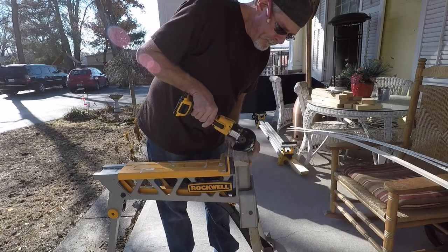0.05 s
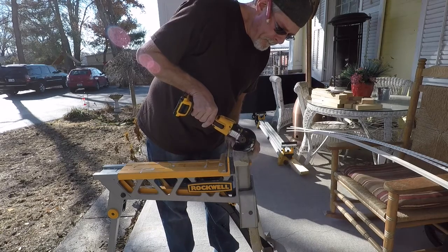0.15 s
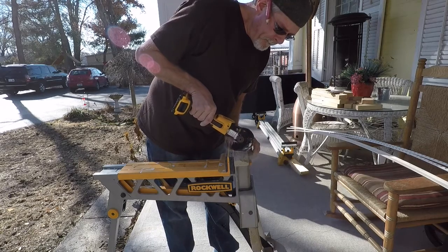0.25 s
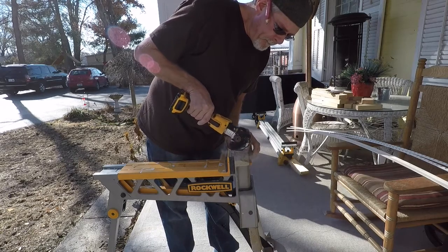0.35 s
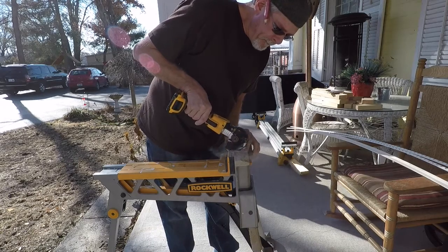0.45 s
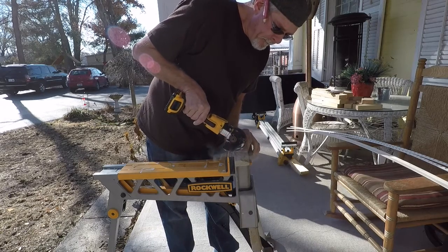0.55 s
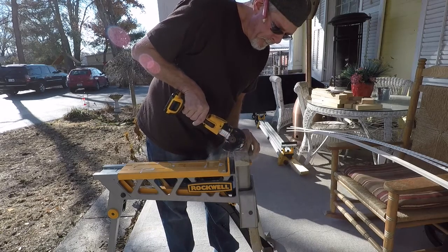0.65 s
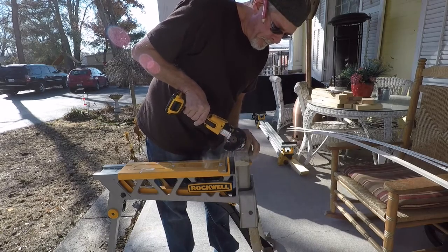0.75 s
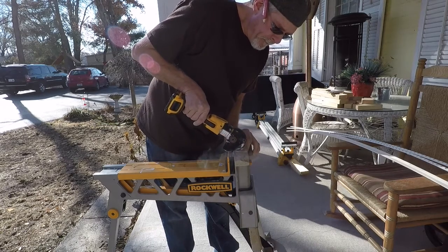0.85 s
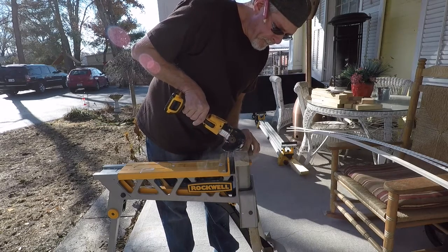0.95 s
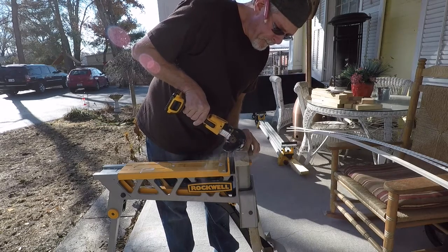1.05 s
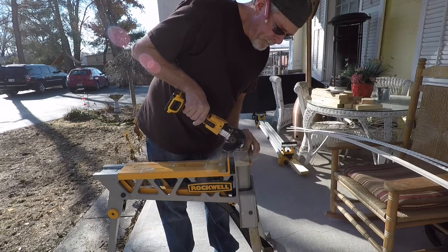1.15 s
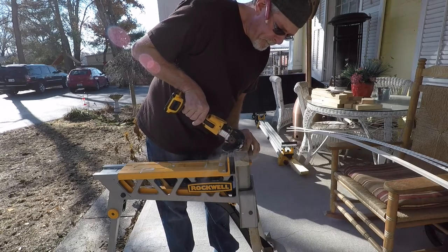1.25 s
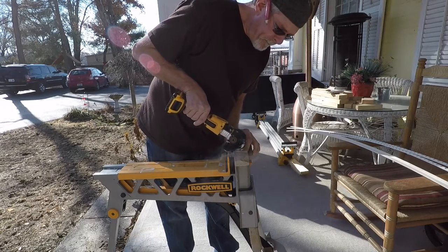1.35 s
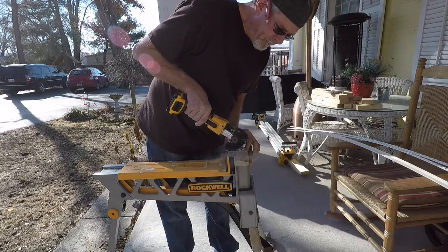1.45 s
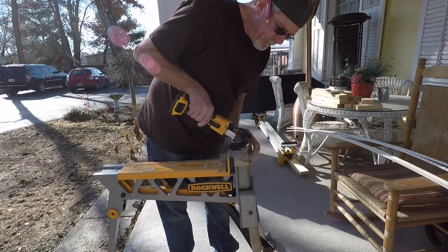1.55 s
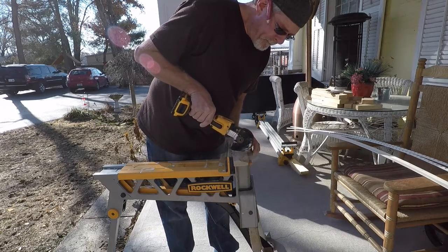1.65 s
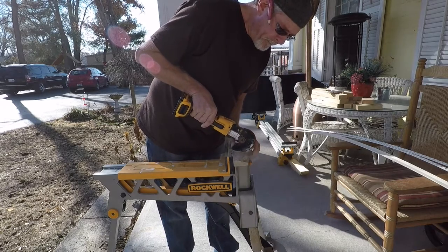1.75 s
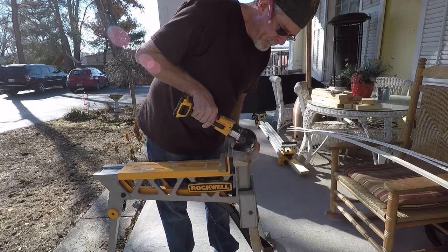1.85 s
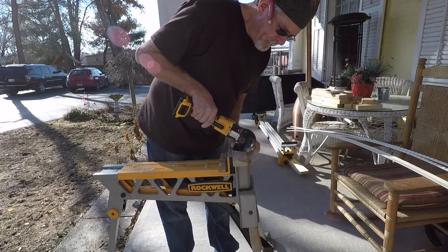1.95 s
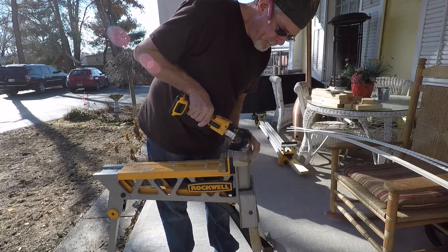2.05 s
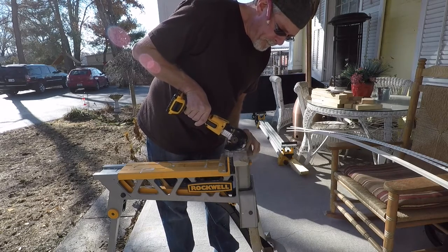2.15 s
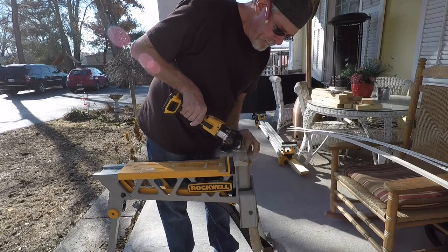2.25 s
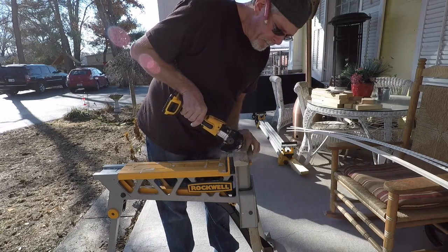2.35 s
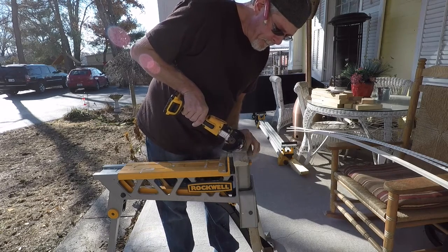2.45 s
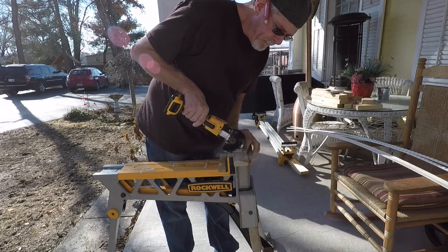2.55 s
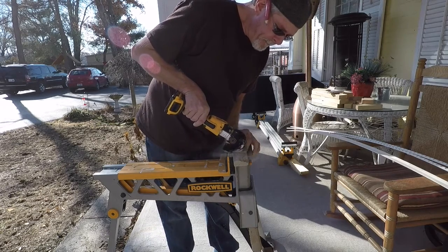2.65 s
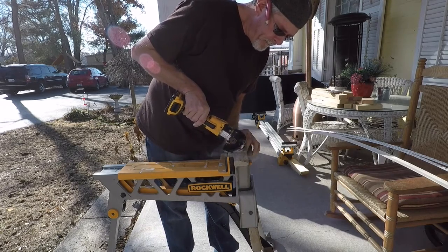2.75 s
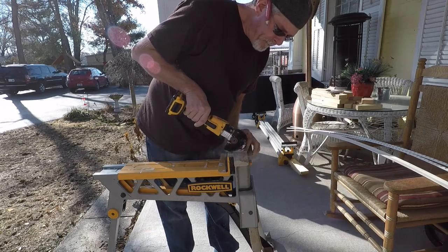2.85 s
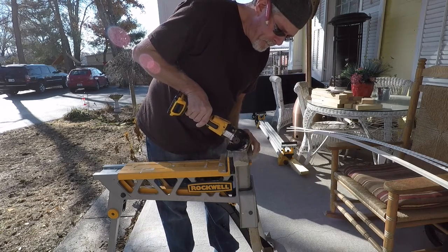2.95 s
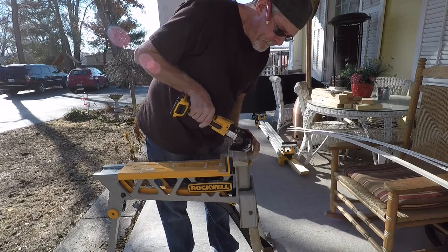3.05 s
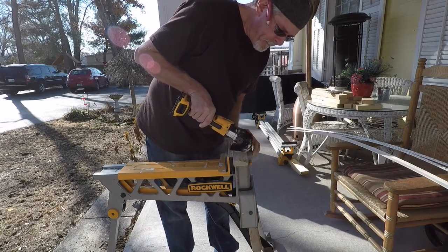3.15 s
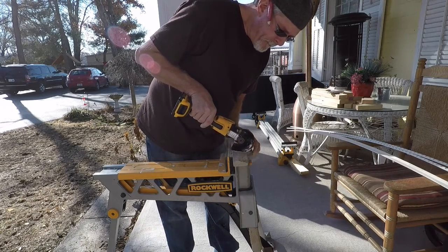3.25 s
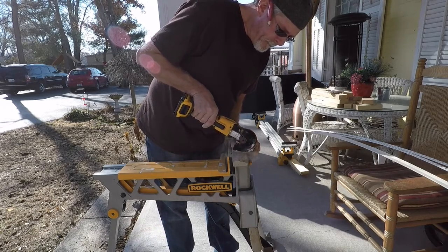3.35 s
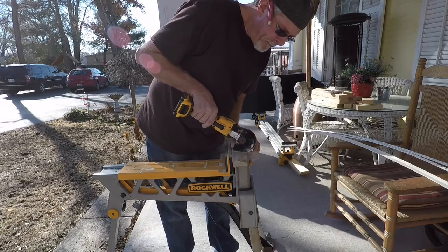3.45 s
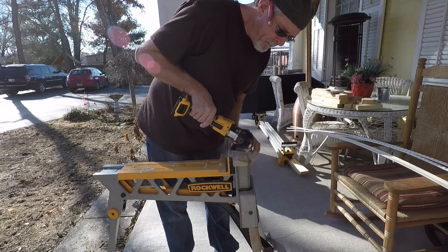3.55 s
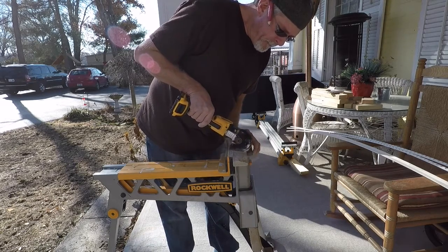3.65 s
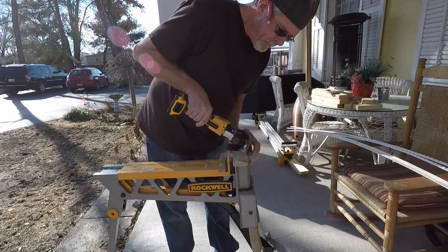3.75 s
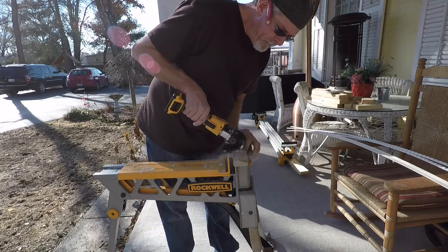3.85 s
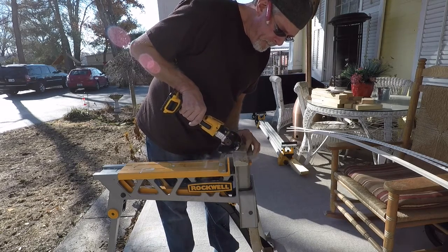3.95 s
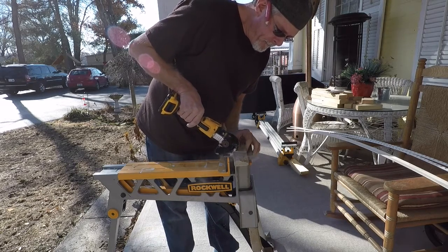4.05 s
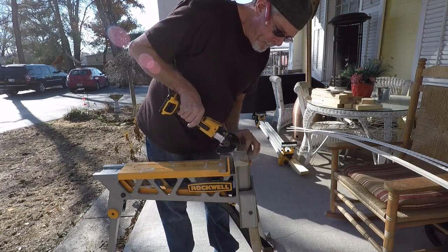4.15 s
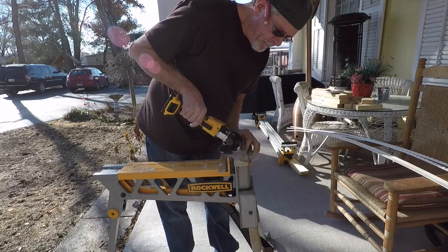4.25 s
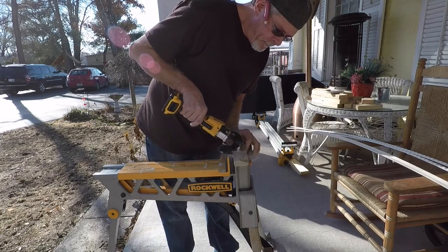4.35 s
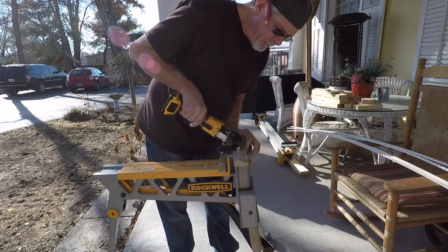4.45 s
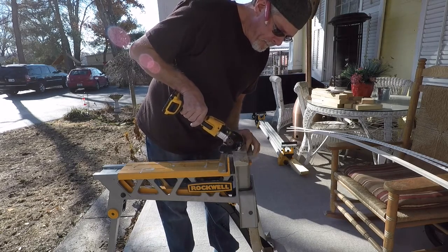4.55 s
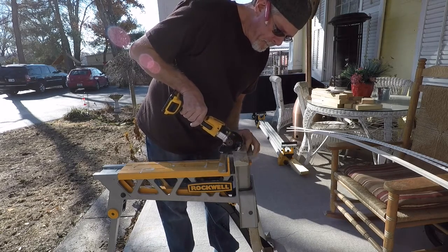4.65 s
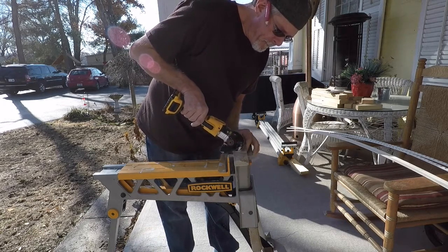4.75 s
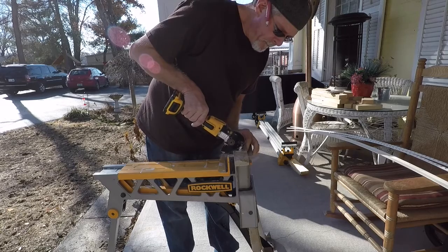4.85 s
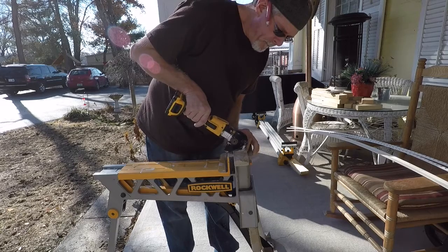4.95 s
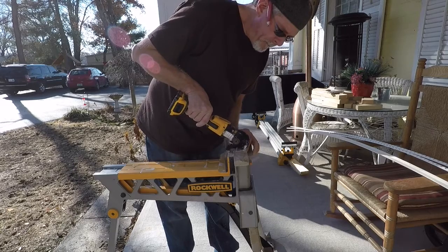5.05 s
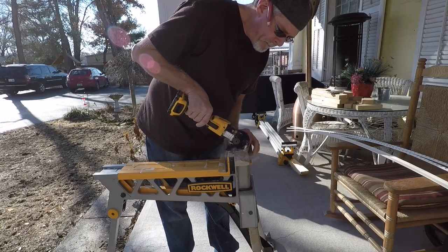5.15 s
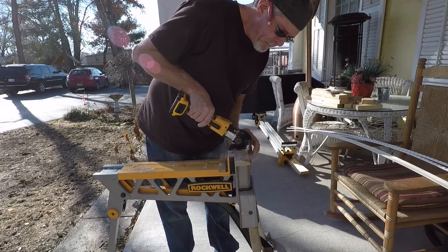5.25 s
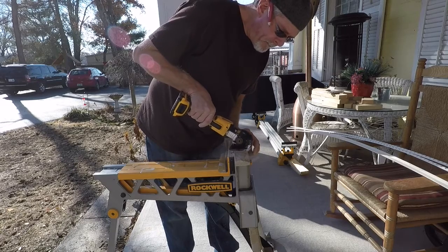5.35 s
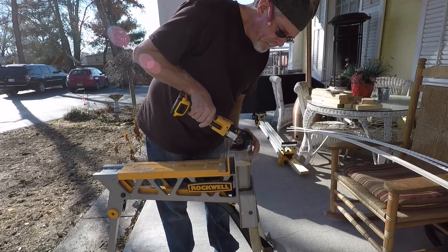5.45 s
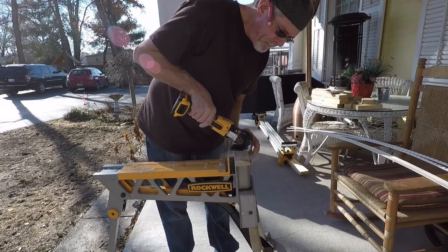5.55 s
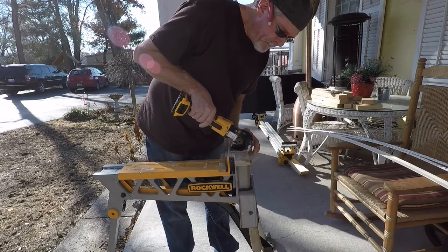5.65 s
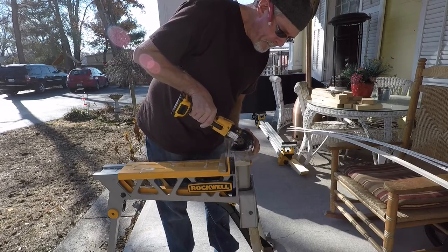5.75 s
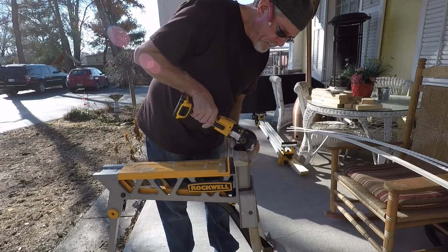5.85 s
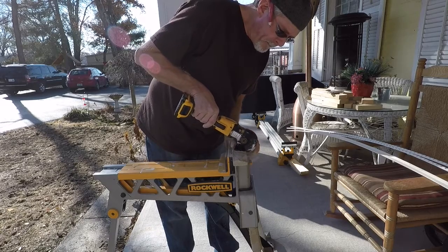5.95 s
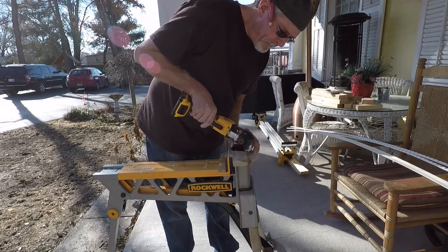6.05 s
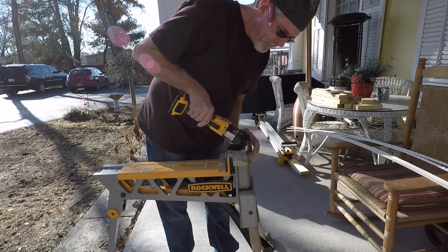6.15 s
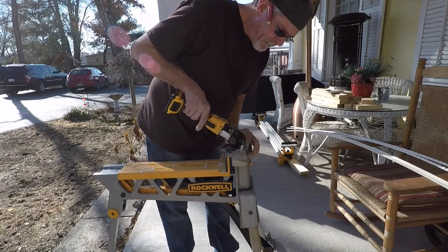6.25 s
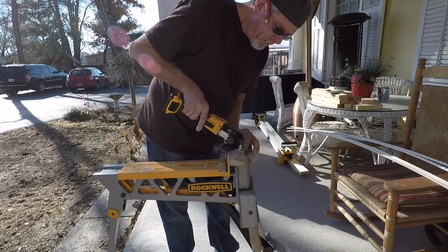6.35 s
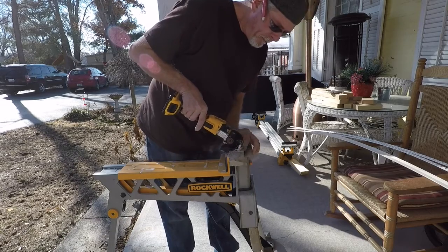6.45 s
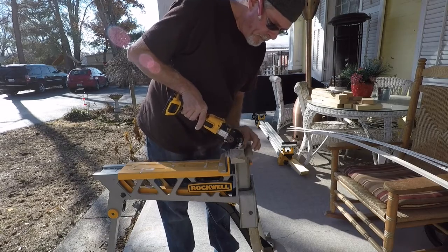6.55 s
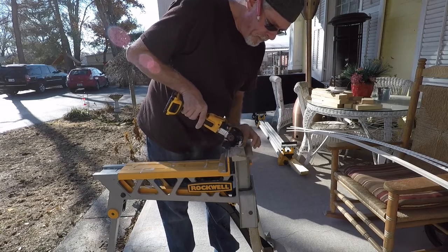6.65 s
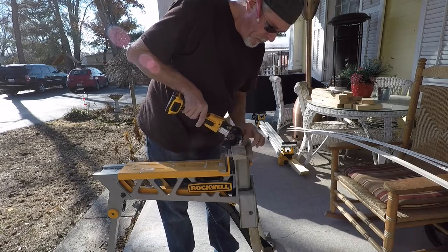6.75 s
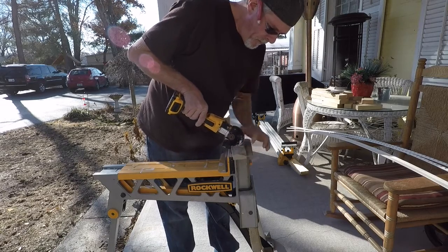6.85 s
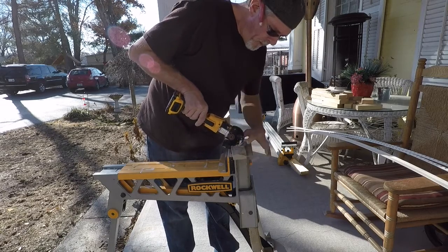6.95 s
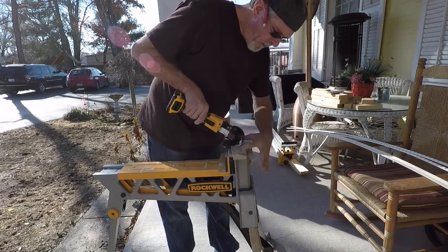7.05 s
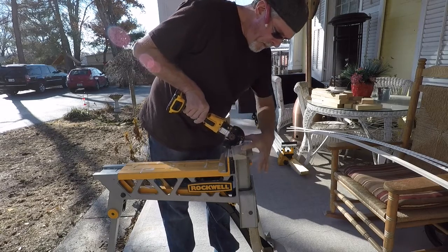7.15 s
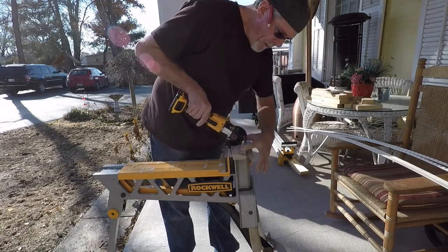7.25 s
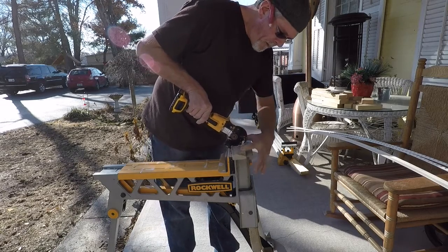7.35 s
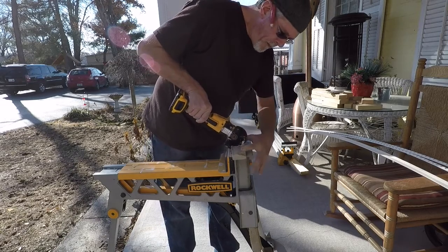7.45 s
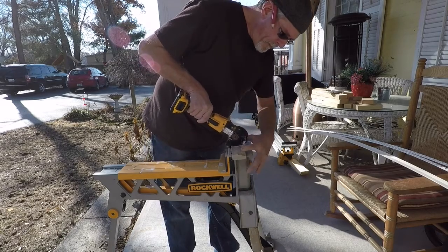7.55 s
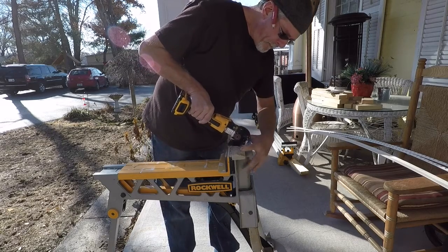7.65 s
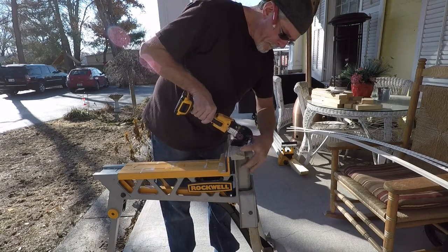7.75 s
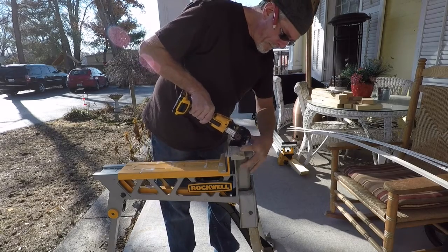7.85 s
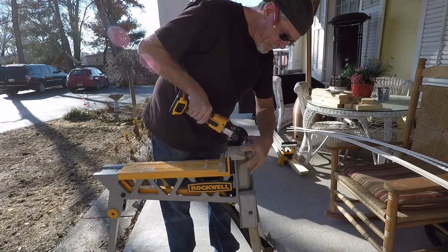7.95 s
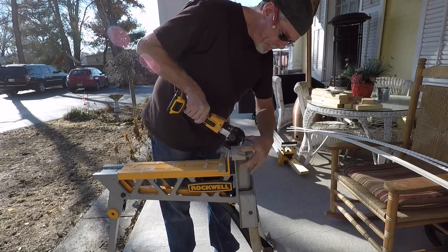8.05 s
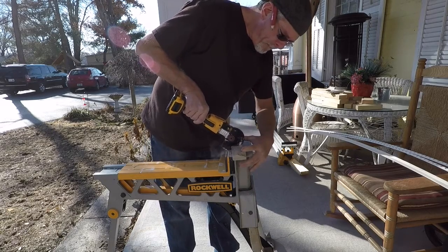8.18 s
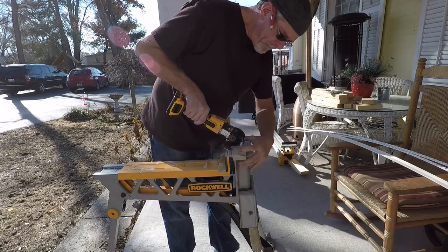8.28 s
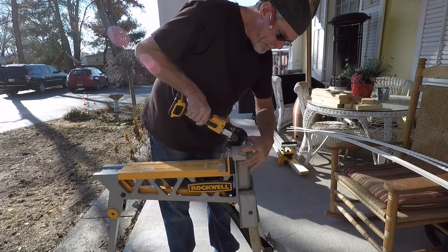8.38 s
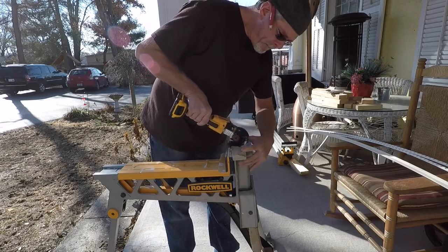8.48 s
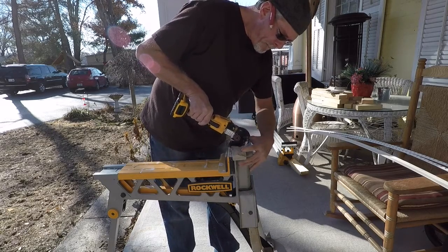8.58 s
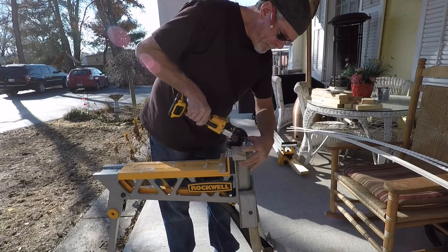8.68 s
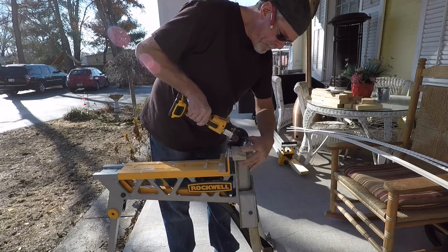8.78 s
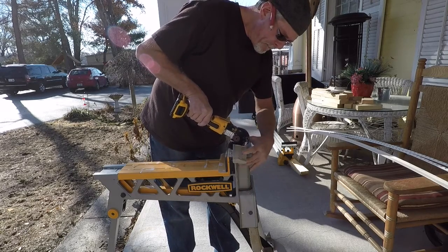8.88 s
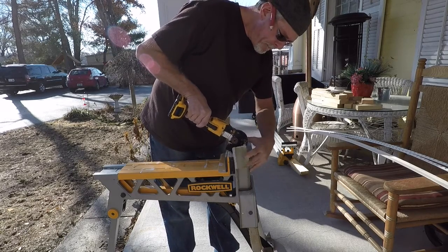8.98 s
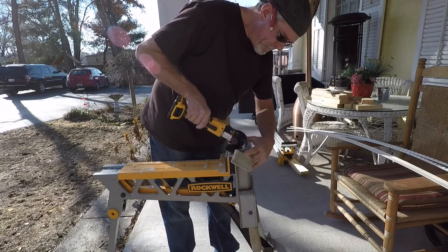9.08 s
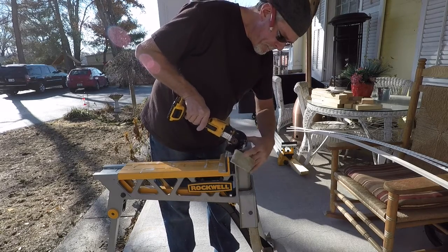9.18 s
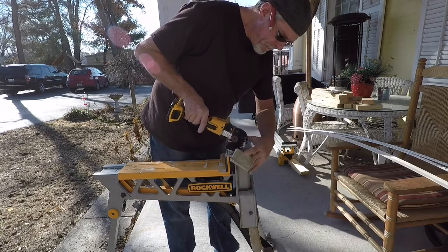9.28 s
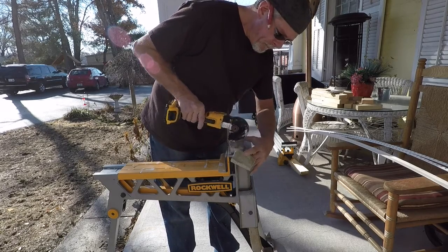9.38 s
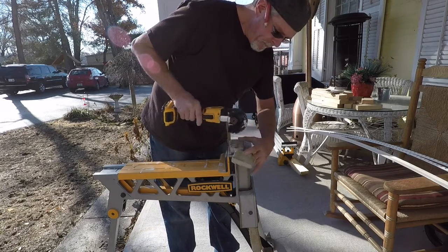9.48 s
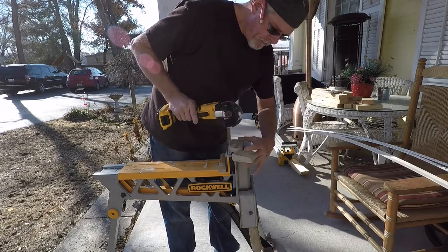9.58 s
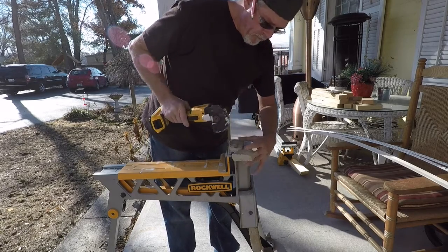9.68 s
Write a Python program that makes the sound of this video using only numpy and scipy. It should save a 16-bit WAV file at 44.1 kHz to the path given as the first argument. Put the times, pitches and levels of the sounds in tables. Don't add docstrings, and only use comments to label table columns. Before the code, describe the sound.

Already running at the start, an oscillating power tool grinds through a clamped slab of faux stone with a loud, rasping, slightly unsteady buzz. After about six seconds it brakes abruptly, leaving quiet yard hiss and tiny handling clicks. The trigger snaps, a very short burst follows, then a second cut of under two seconds. The blade lifts clear, runs down and rings faintly. Close microphone on an open porch, with light wind rumble.

```python
import sys
import numpy as np
from scipy import signal
from scipy.fft import rfft, irfft
from scipy.io import wavfile
from scipy.ndimage import uniform_filter1d, map_coordinates

SR = 44100
rng = np.random.default_rng(int(sys.argv[2]) if len(sys.argv) > 2 else 0)


def gain_from_db(level_db):
    decades = np.asarray(level_db, float) / 20
    return 10 ** decades


def log_audio(samples):
    frames = np.atleast_2d(samples).T
    limited = np.clip(frames, -1, 1)
    pcm = np.round(limited * 32767).astype(np.int16)
    wavfile.write(sys.argv[1], SR, pcm)


N = 428642

# (hum [rel dB], slab rattle [dB], blade sizzle [dB])
SEAT_BALANCE = [(-29.2, 4, -2.5), (-31, 2, -3.5), (-34.5, 4, 1), (-26.5, .5, -1.6), (-35.5, 1, -.5),
                (-35, 4, 1), (-29.5, 3, -1.8), (-30, 3, -3.5), (-31, 1.5, -1.5), (-27.5, .6, -1.4),
                (-27.5, -1.5, -1.5), (-27, 2.5, -1.7), (-30.5, 2.1, -3.8), (-29.2, 3.5, -2.5)]
SEAT_THUD = [(3,), (0,), (2,), (-3,), (7,), (2,), (3,), (-2,), (1,), (-6,), (-7,), (-4,), (-2,), (0,)]
# (frequency [Hz], width [Hz], added level [dB])
BLADE_MODES = [(7300, 350, -3), (8100, 250, -5), (9000, 300, -8), (11700, 350, -3), (12900, 350, -5)]


def tool():
    t = np.arange(N) / SR
    hz, repeating, alternating = stroke(t)
    speed, cut_gain = motor(t)
    loose = np.clip(1 - repeating - alternating, .02, 1)
    chatter = .004 * loose ** 2 * drift(N, size=400)
    hand_tremor = .0035 * drift(N, size=3000)
    turns = np.cumsum(hz * (1 + chatter + hand_tremor)) / SR

    hum_db, rattle_db, sizzle_db = seated(SEAT_BALANCE, t)
    skid_dull_db = -3
    rattle_db, sizzle_db = np.clip([rattle_db, sizzle_db + skid_dull_db * skid(t)], -4, 4)
    slow_rattle_db = 7 * np.sqrt(1 - speed)
    thud_db = seated(SEAT_THUD, t)[0] * speed ** 6
    boom_db = np.where(braked(t), 6, 13)

    grains = patchy(grit(turns))
    grains = grains + (gain_from_db(rattle_db + slow_rattle_db) - 1) * band(grains, 120, 3400)
    grains -= (1 - loose) ** .8 * band(grains, 100, 950)
    grains += (gain_from_db(thud_db) - 1) * band(grains, 330, 800)
    grains += gain_from_db(boom_db) * np.clip(1 - hz / 270, 0, 1) * band(grains, 490, 760)

    grain_gain = loose ** .75 * gain_from_db(-2.5 + 1.2 * drift(N, size=900))
    cut = buzz(turns, loose) + grain_gain * grains
    cut *= 1 + .15 * np.sqrt(alternating) * np.cos(np.pi * turns)
    cut += sum(gain_from_db(db) * signal.lfilter(*signal.iirpeak(f_hz, f_hz / width_hz, SR), cut)
               for f_hz, width_hz, db in BLADE_MODES)
    cut += (gain_from_db(sizzle_db) - 1) * band(cut, 6000, 18000)
    hum = np.sqrt(2) * gain_from_db(hum_db) * (hz / 290) ** 6 * np.sin(2 * np.pi * turns)
    return cut_gain * (cut + hum)


# (multiple of stroke rate [1], level [dB])
BURIED = [(1, -17), (2, -19), (3, -14), (4, -15), (5, -4), (6, -4), (7, -9), (8, -4), (9, -10), (10, -10),
          (11, -8), (12, 0), (13, -10), (14, -10), (15, -8), (16, -7), (17, -5), (18, -12), (19, -16),
          (20, -14), (21, -17), (22, -15)]
BINDING = [(1, -15), (2, -14), (3, -10), (4, -4), (5, -9), (6, -3), (7, -5), (8, -4), (9, -8), (10, -3),
           (11, -5), (12, 0), (13, -4), (14, -11), (15, -3), (16, -3), (17, -4), (18, -7), (19, -10),
           (20, -14), (21, -15), (22, -14)]
SHALLOW = [(1, -20), (2, -11), (3, -17), (4, -13), (5, -6), (6, 0), (7, -1), (8, -9), (9, -2), (10, -6),
           (11, -1), (12, -3), (13, -9), (14, -6), (15, -4), (16, -3), (17, -5), (18, -13), (19, -15),
           (20, -15), (21, -12), (22, -10)]
SECOND_KERF = [(1, -16), (2, -22), (3, -17), (4, -14), (5, -13), (6, -8), (7, -11), (8, -9), (9, -8),
               (10, -9), (11, -6), (12, 0), (13, -7), (14, -11), (15, -8), (16, -8), (17, -4), (18, -12),
               (19, -13), (20, -17), (21, -16), (22, -16)]
CLEAR = [(1, -26), (2, -16), (3, -22), (4, -14), (5, -17), (6, -19), (7, -20), (8, -10), (9, -8), (10, -14),
         (11, 0), (12, -8), (13, -14), (14, -15), (15, -7), (16, -7), (17, -10), (18, -21), (19, -19),
         (20, -17), (21, -18), (22, -14)]
SKIMMING = [(1, -21), (2, -17), (3, -17), (4, -15), (5, -2), (6, -1), (7, -3), (8, -8), (9, -9), (10, -10),
            (11, -7), (12, -4), (13, -6), (14, -4), (15, -2), (16, -1), (17, -5), (18, 0), (19, -6),
            (20, -8), (21, -8), (22, -14)]
ENTERING = [(1, -19), (2, -26), (3, -17), (4, -15), (5, -7), (6, -7), (7, -6), (8, -9), (9, -13), (10, -8),
            (11, -12), (12, 0), (13, -8), (14, -11), (15, -11), (16, -1), (17, -7), (18, -16), (19, -8),
            (20, -18), (21, -19), (22, -19)]
STRAINING = [(1, -18), (2, -19), (3, -8), (4, -7), (5, -10), (6, -6), (7, -5), (8, -8), (9, -8), (10, -8),
             (11, -10), (12, 0), (13, -5), (14, -8), (15, -6), (16, -4), (17, -5), (18, -8), (19, -13),
             (20, -14), (21, -15), (22, -17)]
THROUGH = [(1, -15), (2, -13), (3, -12), (4, -5), (5, -8), (6, -2), (7, -2), (8, -5), (9, -6), (10, -2),
           (11, -6), (12, -3), (13, -4), (14, -2), (15, -3), (16, 0), (17, -6), (18, -8), (19, -14),
           (20, -13), (21, -13), (22, -12)]
EDGING = [(1, -15), (2, -21), (3, -14), (4, -17), (5, -13), (6, -4), (7, -7), (8, -2), (9, -4), (10, -3),
          (11, -9), (12, 0), (13, -6), (14, -8), (15, -4), (16, -1), (17, 0), (18, -5), (19, -9), (20, -14),
          (21, -13), (22, -14)]
LEANING = [(1, -16), (2, -22), (3, -20), (4, -14), (5, -14), (6, -10), (7, -7), (8, -5), (9, -10),
           (10, -10), (11, -6), (12, -2), (13, -7), (14, -8), (15, -6), (16, 0), (17, -3), (18, -10),
           (19, -12), (20, -15), (21, -17), (22, -15)]
BITING = [(1, -16), (2, -17), (3, -11), (4, -10), (5, -6), (6, -7), (7, -2), (8, -6), (9, -6), (10, -4),
          (11, -8), (12, 0), (13, -5), (14, -7), (15, -6), (16, -5), (17, -6), (18, -13), (19, -12),
          (20, -16), (21, -12), (22, -11)]
SAGGING = [(1, -20), (2, -22), (3, -12), (4, -11), (5, -11), (6, -4), (7, -7), (8, -7), (9, -12), (10, -7),
           (11, -11), (12, 0), (13, -8), (14, -12), (15, -6), (16, -6), (17, -7), (18, -10), (19, -18),
           (20, -16), (21, -19), (22, -18)]
DEEP = [(1, -19), (2, -19), (3, -17), (4, -17), (5, -9), (6, -7), (7, -9), (8, -5), (9, -7), (10, -8),
        (11, -11), (12, 0), (13, -10), (14, -13), (15, -11), (16, -8), (17, -9), (18, -14), (19, -17),
        (20, -19), (21, -20), (22, -16)]
SEATS = [BURIED, BINDING, SHALLOW, SECOND_KERF, CLEAR, SKIMMING, ENTERING, STRAINING, THROUGH, EDGING,
         LEANING, BITING, SAGGING, DEEP]
# (half multiple of stroke rate [1], level [dB])
ROCKING = [(.5, -18.5), (1.5, -15), (2.5, -11.5), (4.5, -8), (8.5, 3), (16.5, -7), (52, 2.5)]


def buzz(turns, loose):
    hop, wave = 512, 1024
    scatter_rad, slip_rad, flicker_db, top_db = 2.2, .95, 3.8, -11
    t = np.arange(N // hop + 2) * hop / SR
    hz, repeating, alternating = stroke(t)
    speed = motor(t)[0]
    order = np.arange(1, 105) / 2
    whole = order % 1 == 0
    grit_db = read(GRIT, order * 290)

    high = order > len(BURIED)
    seat_db = np.array([np.where(high, grit_db + top_db, np.interp(order, *np.transpose(s))) for s in SEATS])
    start_s, index = np.transpose(SEATED)
    seat_now = index.astype(int)[np.searchsorted(start_s, t, "right") - 1]
    seat = gain_from_db(seat_db[seat_now]) * (whole & (order > 1))
    seat = uniform_filter1d(seat, size=3, axis=0)
    lines = seat / np.linalg.norm(seat, axis=1)[:, None] * np.sqrt(repeating)[:, None]

    half = gain_from_db(read(ROCKING, order) + grit_db * (order > 5)) * ~whole
    lines += half / np.linalg.norm(half) * np.sqrt(alternating)[:, None]

    chance = shared(drift(lines.shape, size=2)) + 1j * shared(drift(lines.shape, size=2))
    fuzz = evened(gain_from_db(grit_db) * whole * chance)
    fuzz_power = .35 * (1 - repeating - alternating) * np.minimum(hz / 280, 1) ** 6
    lines = lines + fuzz * np.sqrt(fuzz_power / len(order))[:, None]
    blur = np.where(braked(t), .38, .5)
    lines *= speed[:, None] ** (blur[:, None] * order)

    rise = np.sqrt(order / 8) * np.interp(t * SR, np.arange(N), loose)[:, None]
    phase = scatter_rad * shared(rng.standard_normal(len(order)))
    phase = phase + slip_rad * rise * shared(drift(lines.shape, size=4))
    wander_db = np.where((t > 7) & (t < 8.86), 3.3, 2.0)[:, None]
    shake_db = wander_db * drift(lines.shape, size=5) - 4.6
    shake_db += flicker_db * np.minimum(rise, .45) * drift(lines.shape, size=2)
    shake_db[:, order == 12] *= .5

    spectra = np.pad(lines * gain_from_db(shake_db) * np.exp(1j * phase), ((0, 0), (1, 0)))
    waves = irfft(spectra, wave) * wave / np.sqrt(2)
    waves = np.hstack([waves, waves[:, :1]])
    return map_coordinates(waves, [np.arange(N) / hop, turns / 2 % 1 * wave], order=1)


# (frequency [Hz], density [dB per Hz])
GRIT = [(100, -66), (300, -18.5), (700, -14), (1300, -7.5), (2200, -2.5), (2750, -4.5), (3400, -1),
        (4050, -4), (4800, 4), (6000, -8), (7600, 2), (8800, -1.5), (10500, -11.5), (12000, -4.5),
        (15100, -17.5)]


def grit(turns):
    bite_ms, steady, spread_db, back_db = 0.89, 0.23, 0.5, -3.5
    count = np.floor(2 * turns)
    reversal = np.diff(count, prepend=0) * gain_from_db(spread_db * rng.standard_normal(N) + back_db * (count % 2))
    bursts = signal.lfilter([1], [1, -np.exp(-1000 / (bite_ms * SR))], reversal)
    return coloured((steady + uniform_filter1d(bursts, size=12)) * rng.standard_normal(N), GRIT)


def patchy(x):
    patch_db = .9
    z = signal.stft(x, nperseg=512)[2]
    patches = evened(uniform_filter1d(drift(z.shape, size=4), size=12, axis=1))
    return evened(signal.istft(z * gain_from_db(patch_db * patches), nperseg=512)[1][:N])


# (time [s], stroke rate [Hz])
LONG_CUT = [(0.0, 288.3), (0.33, 291.2), (1.21, 290.5), (1.69, 282.9), (2.14, 290.1), (2.86, 287.7),
            (3.23, 279.4), (3.32, 285.7), (3.66, 286.1), (3.92, 295.6), (4.77, 297.5), (4.92, 287.7),
            (5.13, 291.8), (5.25, 285.4), (5.72, 285.0), (5.82, 276.7), (6.01, 295.8), (6.2, 299.8)]
# (time [s], stroke rate [Hz])
SECOND_CUT = [(7.47, 289.8), (7.678, 286.2), (7.818, 294.5), (7.968, 287.7), (8.022, 291.1), (8.844, 291.4),
              (8.882, 299.6), (8.926, 304.0), (9.1, 303.2)]
GRIP = [(.58, .13), (.57, .06), (.78, .025), (.72, .0005), (.82, 0), (.8, 0), (.66, .004), (.5, .13),
        (.7, 0), (.7, .0005), (.74, .0005), (.68, .001), (.55, .05), (.58, .14)]


def stroke(t):
    speed = motor(t)[0]
    hz = speed * curve(LONG_CUT + SECOND_CUT, t)[0]
    settle = np.where(braked(t), 3, 5)
    repeating, alternating = np.array(seated(GRIP, t)) * (1 - skid(t)) * speed ** settle
    return hz, np.maximum(repeating, .33 * (hz > 275)), alternating


# (on [s], off [s], braking time [s], jolt at release [dB])
PULLS = [
    (-1, 6.19, .106, 1.5),
    (7.092, 7.2, .124, 1.5),
    (7.35, 9.1, .185, 0),
]


def motor(t):
    spin_up_s, brake_bend, crawl, jolt_s = .11, 1.5, .12, .025
    cut_db, rise_db, fall_db = -13.7, 15, 55
    speed, gain = np.full(len(t), crawl), np.zeros(len(t))
    for on, off, brake_s, jolt_db in PULLS:
        up = np.maximum(1 - (1 - np.clip((t - on) / spin_up_s, 0, 1)) ** 2, .01)
        down = np.maximum(1 - np.clip((t - off) / brake_s, 0, 1) ** brake_bend, .01)
        db = cut_db + rise_db * np.log10(up) + fall_db * np.log10(down)
        db = db + bumps([(off, jolt_db, jolt_s)], t)
        speed = np.maximum(speed, up * down)
        gain = gain + gain_from_db(db) * (t > on)
    return speed, gain


def braked(t):
    return np.any([(t > off) & (t < off + brake_s) for on, off, brake_s, jolt_db in PULLS], axis=0)


# (time [s], half length [s], pattern lost [0-1])
SKIDS = [(.52, .08, .3), (1.88, .12, 1), (3.38, .17, .7), (5.12, .08, .3), (5.47, .08, .4), (5.84, .12, 1),
         (7.2, .15, .5), (7.43, .05, .5), (8.5, .05, .2), (8.87, .05, .7)]


def skid(t):
    return np.minimum(bumps([(s, lost, half_s) for s, half_s, lost in SKIDS], t), 1)


# (start [s], seat [index])
SEATED = [(0, 6), (.26, 1), (.45, 0), (1.45, 12), (2.05, 13), (2.76, 1), (2.95, 7), (3.55, 0), (3.9, 5),
          (4.18, 2), (4.88, 1), (5.22, 7), (5.95, 8), (7.3, 9), (7.75, 10), (8.0, 11), (8.3, 3), (8.86, 4)]


def seated(table, t):
    shift_s = .05
    start_s, index = np.transpose(SEATED)
    end_s = np.append(start_s[1:], N / SR)
    edges = np.ravel([start_s + shift_s, end_s - shift_s], "F")
    return curve(np.c_[edges, np.repeat(np.array(table)[index.astype(int)], 2, axis=0)], t)


# (frequency [Hz], level [dB], t60 [s])
BLADE_RING = [(1210, 19.5, 0.38), (2030, -25, 1.1), (3000, -23, 1.4), (3305, -14, 0.68), (4161, -12, 0.62),
              (5432, -19, 0.36)]
# (frequency [Hz], level [dB], t60 [s])
FREE_RING = [(2900, -16, 0.76), (3338, -21, 1.1), (4748, -7, 0.25), (5464, -24, 0.72), (6051, -21.5, 4.3),
             (7260, -14, 1.3)]
# (time [s], peak [dB], frequency [Hz], t60 [s])
CLICKS = [(6.5874, -46, 2070, .06), (6.6074, -42, 4590, .05), (6.6717, -48, 4570, .05),
          (6.7096, -50, 1880, .05), (7.0848, -30, 3790, .06), (7.0962, -21, 5140, .04),
          (7.101, -19, 8500, .03), (7.3464, -38, 2100, .05), (7.36, -31, 4420, .04)]


def rings():
    out, t = np.zeros(N), np.arange(SR // 2) / SR
    rise = np.minimum(t / .04, 1)
    for s, db, modes in [(6.24, -61, BLADE_RING), (9.2, -37, FREE_RING)]:
        ring = sum(gain_from_db(db + mode_db - 60 * t / min(t60_s, .7)) * np.sin(2 * np.pi * hz * t)
                   for hz, mode_db, t60_s in modes)
        add(out, s, rise * ring)
    for s, db, hz, t60_s in CLICKS:
        tick = np.diff(uniform_filter1d(rng.standard_normal(len(t) + 1), size=3))
        tick = tick + .25 * np.sin(2 * np.pi * hz * t)
        add(out, s, gain_from_db(db - 60 * t / t60_s) * tick)
    return out


# (frequency [Hz], t60 [s])
PORCH = [(300, 1), (1500, 0.47), (4000, 0.53), (10000, 0.333)]


def porch(x):
    taps = np.zeros(SR)
    at = np.arange(300, SR - 20, 20)
    taps[at + rng.integers(0, 20, len(at))] = rng.choice([-1., 1.], len(at))
    hz, t, z = signal.stft(taps, SR, nperseg=256)
    tail = signal.istft(z * gain_from_db(-60 * t / read(PORCH, hz)[:, None]), SR, nperseg=256)[1]
    return signal.fftconvolve(x, tail / np.linalg.norm(tail))[:N]


# (frequency [Hz], density [dB per Hz])
YARD = [(88, -27), (150, -7.5), (178, -11.5), (229, -17.5), (364, -18.5), (417, -19), (477, -18),
        (650, -17), (5220, -28), (15100, -39.5)]
# (time [s], level [dB])
SHUFFLE = [
    [(6.4, -58.5), (6.63, -54.5), (7.07, -60.5)],
    [(9.35, -57.5), (9.442, -61), (9.72, -59.5)],
]
# (frequency [Hz], density [dB per Hz])
WIND_COLOUR = [(10, 10.5), (22, -13), (45, -12), (80, -5.5), (120, -9), (220, -16.5), (400, -54)]
# (time [s], level change [dB], half length [s])
GUSTS = [(0, 5, .06), (.3, -4, .25), (.92, 3, .25), (3.46, 10, .12), (6.09, 13, .12), (6.65, -4, .4),
         (8.8, -8, 2.2)]
# (time [s], level [dB], half length [s])
BUFFETS = [(.85, -41, .35), (1.75, -41, .25), (3.1, -40, .4), (3.7, -41, .35), (6.9, -51, .25)]


def outdoors():
    t, breeze_db = np.arange(N) / SR, -48.5
    yard = gain_from_db(curve(np.vstack(SHUFFLE), t)[0]) * coloured(rng.standard_normal(N), YARD)
    wind = gain_from_db(breeze_db + bumps(GUSTS, t)) * coloured(rng.standard_normal(N), WIND_COLOUR)
    pushes = bumps([(s, gain_from_db(db), half_s) for s, db, half_s in BUFFETS], t)
    return yard, wind + pushes * evened(band(rng.standard_normal(N), 3, 20))


def evened(x):
    return x / np.sqrt(np.mean(abs(x) ** 2) + 1e-20)


def read(points, hz):
    f, value = np.transpose(points)
    return np.interp(np.log(hz + 1), np.log(f + 1), value)


def curve(rows, t):
    s, *columns = np.transpose(rows)
    return [np.interp(t, s, c) for c in columns]


def coloured(x, points):
    log_gain = read(points, abs(np.fft.fftfreq(16384, 1 / SR))) * np.log(10) / 20
    taps = np.fft.ifft(np.exp(np.conj(signal.hilbert(log_gain)))).real[:8192]
    return evened(signal.oaconvolve(x, taps)[:N])


def band(x, low_hz, high_hz):
    return signal.sosfiltfilt(signal.butter(2, [low_hz, high_hz], "band", fs=SR, output="sos"), x)


def drift(shape, size):
    return evened(uniform_filter1d(uniform_filter1d(rng.standard_normal(shape), size, 0), size, 0))


def shared(x):
    return evened(uniform_filter1d(x, size=5, axis=-1))


def bumps(rows, t):
    return sum(height * np.exp(-2 * ((t - s) / half_s) ** 2) for s, height, half_s in rows)


def add(mix, s, sound):
    part = mix[round(s * SR):][:len(sound)]
    part += sound[:len(part)]


def scene():
    near = tool() + rings()
    running = np.clip(np.sqrt(abs(uniform_filter1d(near ** 2, size=2000))) / .1, 0, 1)
    yard, wind = outdoors()
    mix = near + gain_from_db(-21) * porch(near) + gain_from_db(-9 * running) * yard + wind
    return np.tile(mix, (2, 1))


def low_pass(x):
    return signal.sosfilt(signal.butter(12, 15220, fs=SR, output="sos"), x)


# (time [s], low edge [kHz], high edge [kHz])
SPLITS = [(.36, 8.2, 10.5), (.63, 8.2, 14), (1.15, 13.8, 15.2), (1.2, 4.1, 5.9), (1.46, 7.5, 13.3),
          (1.92, 5.1, 6.5), (1.92, 12.4, 14), (2.17, 12.5, 14.7), (2.29, 13, 14.7), (3.03, 6.9, 8.5),
          (3.14, 11.7, 13.3), (3.54, 6.9, 11.2), (4.84, 11.7, 13.3), (5.05, 6.9, 9.1), (6.19, 12.4, 14),
          (7.74, 12.4, 14), (8.42, 5.1, 6.5), (8.65, 5.6, 7), (8.8, 13, 15.2), (8.83, 9.6, 11.9),
          (8.88, 8.9, 10.5)]


def record(dry):
    soft, side = 1.08 * np.tanh(dry / 0.97), np.zeros(N)
    khz = np.fft.rfftfreq(2048, 1000 / SR)
    for s, low_khz, high_khz in SPLITS:
        earlier = soft[0, round(s * SR) - 6144:][:2048]
        split = irfft(rfft(earlier) * (khz > low_khz) * (khz < high_khz))
        add(side, s - 1024 / SR, .7 * np.hanning(2048) * split)
    return low_pass(soft + np.outer([1, -1], side))


dry = scene()
out = record(dry)
log_audio(out)
```